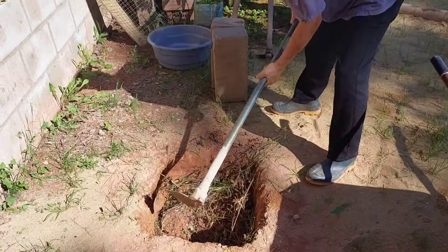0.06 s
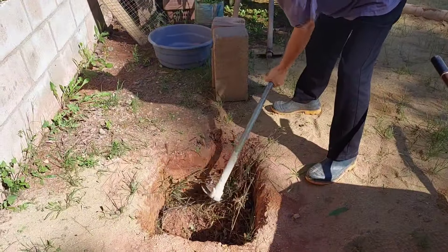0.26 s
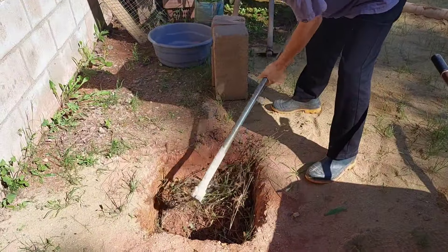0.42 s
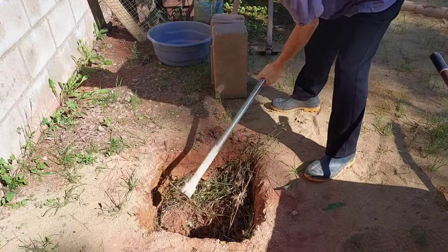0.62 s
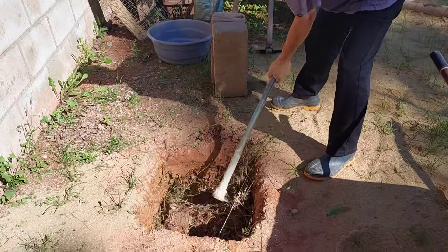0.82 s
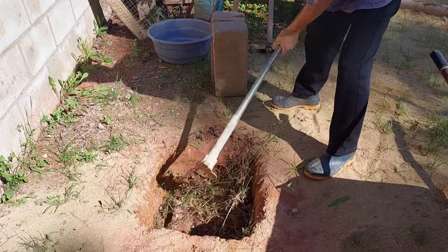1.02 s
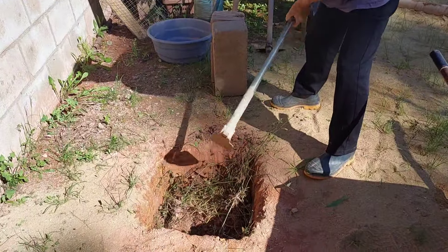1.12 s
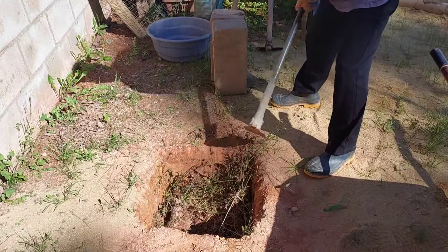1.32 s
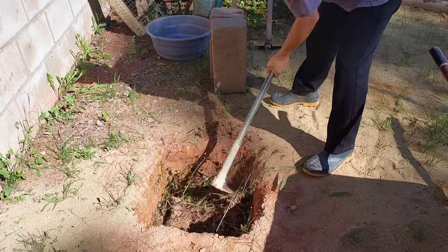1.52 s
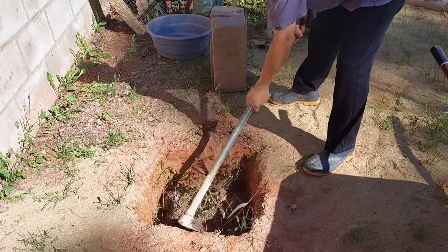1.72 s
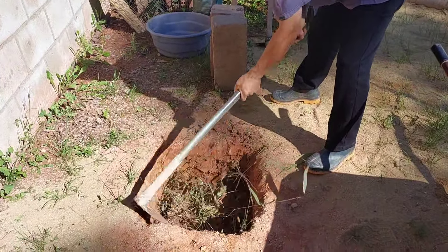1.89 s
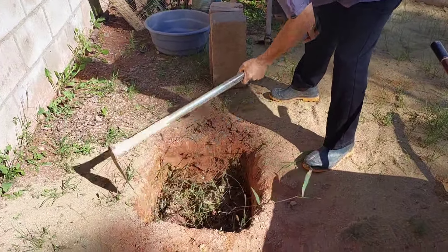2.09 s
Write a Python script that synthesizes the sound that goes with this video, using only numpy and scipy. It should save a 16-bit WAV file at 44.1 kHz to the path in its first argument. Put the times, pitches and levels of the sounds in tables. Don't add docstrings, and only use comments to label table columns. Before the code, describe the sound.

A metal hoe chops twice into a soil pit, grit showering, blade scraping, in a breezy garden

```python
import sys
import numpy as np
from scipy import signal
from scipy.fft import rfft, irfft
from scipy.io import wavfile
from scipy.ndimage import uniform_filter1d

SR = 44100
rng = np.random.default_rng(int(sys.argv[2]) if len(sys.argv) > 2 else 0)


def decibels_to_gain(level_db):
    exponent = np.asarray(level_db, float) / 20
    return 10 ** exponent


def generate_wav(sig):
    pcm = np.round(np.clip(np.atleast_2d(sig).T, -1, 1) * 32767).astype(np.int16)
    wavfile.write(sys.argv[1], SR, pcm)


N = 94815
T = np.arange(N) / SR
HZ = np.fft.rfftfreq(N, 1 / SR)

# [f/Hz, level per Hz/dB]
HISS_TONE = [(88, -40), (150, -9), (416, -9), (641, -5.5), (931, -13), (1920, -19.5), (3020, -20.5),
             (7800, -21.5), (8600, -31), (16300, -23)]
# [f/Hz, level per Hz/dB]
WIND_TONE = [(12, -47), (28, -16), (42, -2.5), (65, 2.5), (103, -10), (143, -17), (203, -22), (375, -43.5),
             (450, -74), (580, -73), (990, -120)]
# [middle t/s, half width/s, strength/dB]
LEFT_GUSTS = [(0.04, 0.02, -27.5), (0.281, 0.13, -34.5), (0.299, 0.033, -32.5), (0.473, 0.031, -24.5),
              (0.528, 0.017, -22.5), (0.54, 0.0081, -24.5), (1.788, 0.0023, -27), (0.591, 0.021, -26.5),
              (0.646, 0.02, -20), (0.778, 0.073, -25.5), (.86, 0.021, -31.5), (1.097, 0.0085, -26.5),
              (1.162, 0.039, -24.5), (1.331, 0.027, -34.5), (1.452, 0.058, -34.5), (1.562, 0.012, -26),
              (1.666, 0.019, -23), (1.714, 0.03, -31), (1.828, 0.041, -28)]
RIGHT_GUSTS = [(0.448, 0.017, -31.5), (0.599, 0.022, -26), (0.758, 0.026, -23.5), (0.852, 0.037, -28),
               (.915, 0.046, -31.5), (0.81, 0.0033, -23), (1.165, 0.066, -42), (1.738, 0.049, -33.5),
               (1.801, 0.018, -27.5), (1.891, 0.038, -29)]
CALM_DB = (-40.5, -43)

# [start t/s, length/s, from f/Hz, to f/Hz, level/dB]
WHISTLES = [
    (0, .045, 4250, 4000, -63),
    (.04, .075, 3700, 3350, -60),
    (.12, .065, 3650, 3400, -63),
    (.324, .035, 3600, 3560, -56),
    (.36, .06, 3540, 3520, -62),
    (.58, .09, 5650, 5600, -68),
    (2.025, .05, 1560, 1550, -64),
]
# [start t/s, length/s, from f/Hz, to f/Hz, level/dB]
CHIRP = (.538, .142, 6700, 5900, -62.5)
# [t/s, f/Hz (not used, birds() sets the pitch), level/dB]
LONG_NOTE = [(0.33, 2687, -56), (0.35, 2661, -49), (0.394, 2660, -58), (0.42, 2642, -67),
             (0.434, 2646, -62), (0.462, 2646, -67), (0.474, 2644, -74), (0.498, 2662, -63),
             (0.55, 2663, -71)]

# [t/s, level/dB, centre f/Hz]
PEBBLES = [
    (0.105, -56, 5600),
    (1.211, -59.5, 9300),
    (1.632, -42, 9000),
    (1.709, -48, 4700),
    (1.835, -49.5, 2160),
    (1.879, -52.5, 9100),
    (1.939, -47.5, 8900),
    (1.6641, -37, 4600),
    (1.667, -42.5, 3080),
]
# [start t/s, rise/s, hold/s, fade t60/s, level/dB]
SHOWERS = [(0.182, 0.0015, 0.0055, 0.19, -45.5), (0.197, 0.0037, .006, .05, -42),
           (0.206, .005, 0.013, 0.14, -80), (0.326, 0.013, 0.049, 0.95, -62),
           (0.683, 0.0011, 0.027, 0.23, -44.5), (0.237, 0.0095, 0.018, 0.088, -58.5),
           (0.731, 0.034, 0.017, 0.22, -42), (0.806, 0.04, 0.028, 0.53, -54.5),
           (1.46, 0.0063, 0.013, 0.49, -50.5), (1.488, 0.04, 0.093, 0.13, -44.5),
           (1.645, 0.011, 0.11, 0.98, -50)]
# [f/Hz, level per Hz/dB]
GRIT_TONE = [(180, -46), (300, -34), (656, 0), (1060, -3.5), (2480, -3), (2790, -0.5), (4090, -0.5),
             (15000, -4), (16000, -1.5)]

# [t/s, crack level/dB, crushing time/s, blow level/dB, lead-in level/dB]
CHOPS = [
    (0.2096, -17.5, 0.0026, -16, -29),
    (0.7137, -21, 0.0062, -29, -28),
]
# [f/Hz, level per Hz/dB]
CRACK_TONES = [
    [(88, -34), (150, -6), (589, -3), (1870, -23), (2600, -15), (3220, -18), (5910, -15.5), (6640, -21),
     (16000, -26.5)],
    [(88, -36), (170, 5.5), (450, -7.5), (900, -2.5), (1600, -8), (2060, -15), (2920, -9), (3600, -13),
     (6260, -12), (16000, -26)],
]
THUD_DB = (-2, 8)
# [delay t/s, signed push, width/s]
JOLTS = [
    (0, -1.35, 0.00014),
    (.0009, 0.93, 0.00042),
    (.0024, -0.51, .0004),
    (.003, 0.42, 0.00023),
    (.0058, -.7, 0.0002),
    (.0088, 0.56, .0006),
]
# [f/Hz, level/dB, t60/s]
HANDLE_AND_GROUND = [(330, -7.5, 0.13), (474, 1, 0.027), (519, -5, 0.12), (710, -8, 0.041),
                     (880, -5.5, 0.072), (1237, 3, 0.049), (1553, -19, 0.062), (2175, -1.5, 0.04),
                     (2480, -10, 0.04), (583, -8.5, 0.036)]
# [t/s, f/Hz, level/dB, t60/s]
TINKS = [(.2092, 2500, -17, .018), (.2133, 2450, -23, .02), (.217, 2480, -25, .03), (.2045, 2300, -36, .03),
         (.2095, 1600, -24, .04), (.2095, 3900, -25, .03), (.2783, 6850, -39, .05), (.2863, 6820, -33, .07),
         (.2768, 1500, -43, .04), (.2755, 2650, -42, .05), (.288, 2650, -40, .06), (.312, 4500, -47, .07),
         (.267, 3600, -50, .05), (.546, 4020, -62, .05), (.716, 2960, -29, .04), (.72, 860, -31, .05),
         (1.4138, 2610, -42, .05), (1.4248, 4850, -37, .05), (1.4255, 7600, -40, .04),
         (1.425, 6800, -40, .04), (1.432, 2620, -40, .04), (1.44, 4850, -40, .06), (1.643, 3560, -49, .06),
         (1.663, 5300, -43, .02), (1.6635, 6815, -41, .04), (1.6645, 2880, -41, .04),
         (1.669, 3270, -43, .03), (1.667, 5070, -44, .07)]

# [start t/s, rise/s, hold/s, fade t60/s, level/dB]
SCRAPES = [
    (0.273, 0.0028, 0.0074, 0.052, -38.5),
    (.284, 0.0043, 0.012, 0.083, -38),
    (0.358, 0.0078, 0.0067, 0.051, -51.5),
    (1.404, 0.0075, 0.013, 0.04, -42.5),
    (1.419, 0.0044, 0.0037, 0.048, -36.5),
    (1.431, .004, 0.0078, 0.061, -45.5),
    (1.77, 0.0011, 0.018, 0.069, -57.5),
]
# [f/Hz, level per Hz/dB]
RASP_TONE = [(180, -47), (300, -40), (634, 2), (1100, -23), (1360, -8), (2140, -3), (6850, 5), (16000, -6)]
BLADE_HZ = [650, 950, 1378, 1976, 2280, 2650, 2870, 3200, 4330, 4900, 5640, 6390, 6830, 8440]
BLADE_DB = [-11, -10, -9, -7, -12, -3, -9, -10, -13, -5, -6, -9, 0, -7]

# [start t/s, rise/s, hold/s, fade t60/s, level/dB]
SWINGS = [
    (0.592, 0.046, 0.045, 0.5, -48.5),
    (1.007, 0.039, 0.022, 0.52, -53),
    (1.076, 0.0056, 0.022, 0.54, -49),
    (1.419, 0.0078, 0.025, 0.16, -41.5),
    (1.467, 0.06, 0.022, 0.22, -60),
]
# [f/Hz, width/Hz, level/dB]
TUBE = [(662, 175, 4), (789, 146, -2.5), (931.5, 21.5, 0.5), (1188, 68, -11), (1580, 360, -10.5)]
# [start t/s, length/s, from f/Hz, to f/Hz, level/dB]
HUMS = [
    (1.016, 0.092, 836, 973, -53.5),
    (1.341, 0.089, 577, 860, -50.5),
]

# [f/Hz, shared part 0 to 1]
SHARED = [(300, .99), (600, .96), (1300, .6), (2300, .85), (5000, .62), (12000, .54)]


def evened(x):
    return x / np.sqrt(np.mean(x ** 2) + 1e-20)


def read(points, hz):
    f, value = np.transpose(points)
    return np.interp(np.log(hz + 1), np.log(f + 1), value)


def colour(x, points):
    return evened(irfft(rfft(x) * decibels_to_gain(read(points, HZ)), N))


def shape(start, rise, hold, t60, db):
    up = np.clip((T - start) / max(rise, 1e-4), 0, 1)
    fade_s = np.maximum(T - start - rise - hold, 0)
    return up ** 2 * decibels_to_gain(db - 60 * fade_s / max(t60, .005))


def resonate(x, hz, width_hz):
    turn = np.exp(2j * np.pi * np.cumsum(hz * np.ones(len(x))) / SR)
    r = np.exp(-np.pi * width_hz / SR)
    smoothed = signal.lfilter([1 - r], [1, -r], x / turn + 1e-18)
    return 2 * (turn * smoothed).real


def resonate_noise(noise, hz, width_hz):
    return evened(resonate(resonate(noise, hz, width_hz), hz, width_hz))


def ring(modes):
    t = T[:8000]
    x = sum(decibels_to_gain(db - 60 * t / t60) * np.sin(2 * np.pi * hz * t) for hz, db, t60 in modes)
    return x / np.linalg.norm(x)


def grains(per_s, spread_db):
    chance, size, push = rng.random(N), rng.exponential(1, N), rng.standard_normal(N)
    return evened(push * (chance < per_s / SR) * decibels_to_gain(spread_db * np.minimum(size, 4)))


def slow(per_s):
    return evened(irfft(rfft(rng.standard_normal(N)) / (1 + (HZ / per_s) ** 4), N))


def garden_hiss():
    a, b = (colour(rng.standard_normal(N), HISS_TONE) for _ in "ab")
    same = 0.044
    pair = np.array([a, same * a + np.sqrt(1 - same ** 2) * b]) * decibels_to_gain(.8 * slow(5))
    return pair * decibels_to_gain(-63 + 5.5 * np.array([[.5], [-.5]]))


def wind():
    out = []
    for gusts, calm_db in zip((LEFT_GUSTS, RIGHT_GUSTS), CALM_DB):
        force = sum(decibels_to_gain(db) * np.exp(-((T - s) / half) ** 2) for s, half, db in gusts)
        low = colour(rng.standard_normal(N), WIND_TONE)
        throb_hz = 61.2 + 378 * force
        throb = evened(resonate(resonate(rng.standard_normal(N), throb_hz, 32.3), throb_hz, 32.7))
        steady = throb / np.sqrt(uniform_filter1d(throb ** 2, size=1200) + 0.16)
        high = evened(resonate(resonate(rng.standard_normal(N), 144, 82), 147, 84))
        rumble = (decibels_to_gain(calm_db) + decibels_to_gain(-6) * force) * low
        out.append(rumble + force * steady + decibels_to_gain(2.5) * force ** 2 * high)
    return np.array(out)


def note(start, length, hz0, hz1, db, width_hz, clear, sag_db=-4, edge=0.22):
    u = np.clip((T - start) / length, 0, 1)
    hz = hz0 + (hz1 - hz0) * u
    fuzz = resonate_noise(rng.standard_normal(N), hz, width_hz)
    pure = np.sin(2 * np.pi * np.cumsum(hz) / SR)
    loudness = decibels_to_gain(db + sag_db * u) * abs(np.sin(np.pi * u)) ** edge * (u < 1)
    return loudness * (clear * pure + (1 - clear) * fuzz)


def birds():
    whistles = sum(note(*row, width_hz=220, clear=0.13) for row in WHISTLES)
    s, _, db = np.transpose(LONG_NOTE)
    long = note(s[0], s[-1] - s[0], 2660, 2655, 4.5, width_hz=60, clear=0.89, sag_db=0)
    long = long * decibels_to_gain(np.interp(T, s, db))
    return whistles + long + note(*CHIRP, width_hz=1500, clear=0)


def pebbles():
    noise = rng.standard_normal(N)
    return sum(evened(resonate(noise, hz, 0.94 * hz)) * shape(s - .001, 0.00033, 0.0007, 0.029, db)
               for s, db, hz in PEBBLES)


def grit():
    return colour(grains(7000, 0.24), GRIT_TONE) * sum(shape(*row) for row in SHOWERS)


def chops():
    lead_s, thud_lead_s, thud_rise_s = 0.0088, .001, 0.0065
    thud_hz, thud_t60 = 121, 0.078
    out = 0
    for (s, db, crush, blow_db, lead_db), tone, thud_db in zip(CHOPS, CRACK_TONES, THUD_DB):
        crack = colour(grains(20000, .6), tone)
        crush_shape = shape(s, 0.00089, crush, 0.028, db)
        out = out + crack * (crush_shape + shape(s - lead_s, lead_s, 0, 0.045, lead_db))
        jolts = sum(push * np.exp(-((T - s - late) / wide) ** 2) for late, push, wide in JOLTS)
        ringing = signal.oaconvolve(jolts, ring(HANDLE_AND_GROUND))[:N]
        out = out + decibels_to_gain(blow_db) * (decibels_to_gain(3.5) * jolts + decibels_to_gain(-8) * ringing)
        t = np.maximum(T - s + thud_lead_s, 0)
        thud = np.sin(2 * np.pi * thud_hz * t) * np.minimum(t / thud_rise_s, 1)
        out = out + decibels_to_gain(blow_db + thud_db - 60 * t / thud_t60) * thud
    return out


def tinks():
    return sum(shape(s, 0.0017, 0, t60, db) * np.sin(2 * np.pi * hz * (T - s)) for s, hz, db, t60 in TINKS)


def scrapes():
    push = sum(shape(*row) for row in SCRAPES)
    slips = grains(16000, .6)
    blade_t60 = np.linspace(.07, .04, len(BLADE_HZ))
    blade = ring(zip(BLADE_HZ, BLADE_DB, blade_t60))
    return signal.oaconvolve(slips * push, blade)[:N] + decibels_to_gain(2.5) * push * colour(slips, RASP_TONE)


def swings():
    air = rng.standard_normal(N) * decibels_to_gain(0.87 * slow(56))
    tube = evened(sum(decibels_to_gain(db) * resonate_noise(air, hz, width) for hz, width, db in TUBE))
    swish = tube * sum(shape(*row) for row in SWINGS)
    return swish + sum(note(*row, width_hz=134, clear=0.26, edge=1.2) for row in HUMS)


def bounced(x):
    near = rng.standard_normal(500) * (rng.random(500) < .2) * decibels_to_gain(-60 * T[:500] / 0.018)
    return signal.oaconvolve(x, near / np.linalg.norm(near))[:N]


def yard(x, t60=0.14):
    t = T[:6000]
    echoes = rng.standard_normal((2, 6000)) * (rng.random((2, 6000)) < .05)
    echoes = echoes * decibels_to_gain(-60 * t / t60) * (t > .002)
    return signal.oaconvolve(x[None], echoes / np.linalg.norm(echoes[0]), axes=1)[:, :N]


def ports(same, apart):
    shared, side = np.clip(read(SHARED, HZ), 0, 1), np.array([[.5], [-.5]])
    lag_s, pan_db = .00001, 1.5
    direct = np.sqrt(shared) * rfft(same) * np.exp(-2j * np.pi * HZ * lag_s * side)
    opposite = np.sqrt(1 - shared) * 2 * side * rfft(apart)
    return decibels_to_gain(pan_db * side) * irfft(direct + opposite, N)


def scene():
    far = birds()
    hoe = pebbles() + chops() + tinks() + scrapes() + swings()
    close = hoe + grit()
    echoed = close - uniform_filter1d(close, size=40)
    near = ports(close, bounced(hoe) + grit()) + decibels_to_gain(-11.5) * yard(echoed)
    far = far * decibels_to_gain([[.7], [-.7]]) + decibels_to_gain(-22) * yard(far, .12)
    return near + far + wind() + garden_hiss()


def band_limit(x):
    return signal.sosfilt(signal.butter(12, 16490, fs=SR, output="sos"), x)


def record(dry):
    treble_cut = signal.firwin(511, 15880, window=("kaiser", 9), fs=SR)
    mix = signal.oaconvolve(dry, treble_cut[None], "same")
    return band_limit(mix)


dry = scene()
out = record(dry)
generate_wav(out)
```